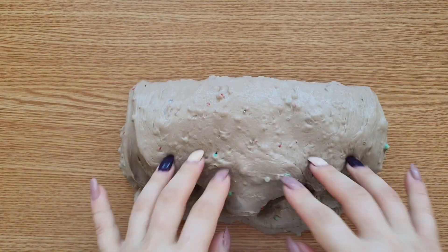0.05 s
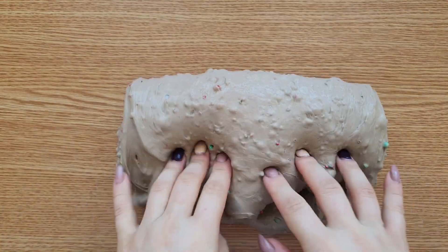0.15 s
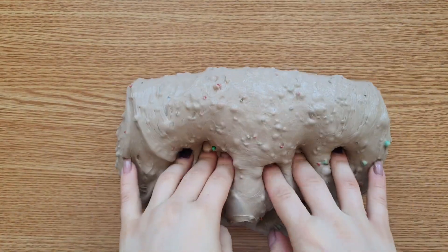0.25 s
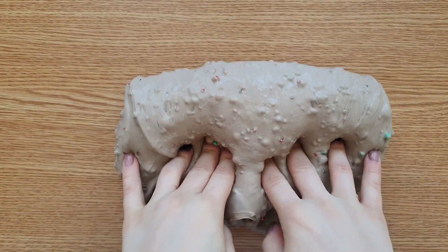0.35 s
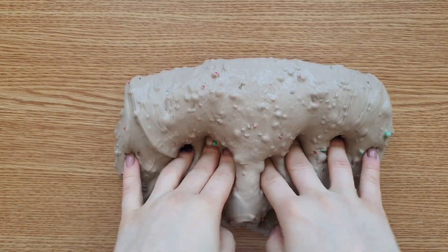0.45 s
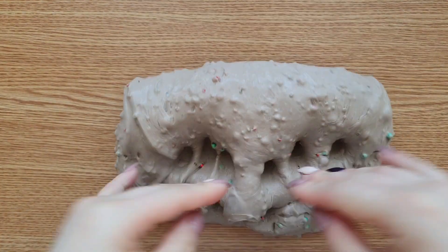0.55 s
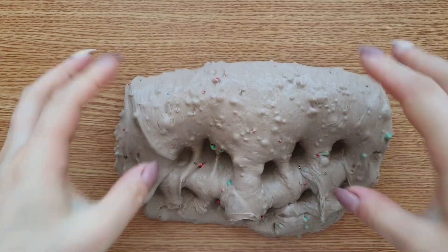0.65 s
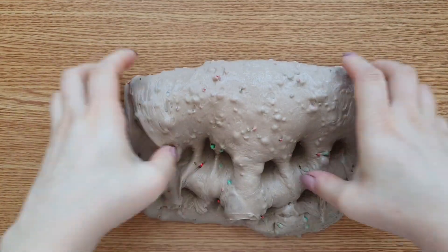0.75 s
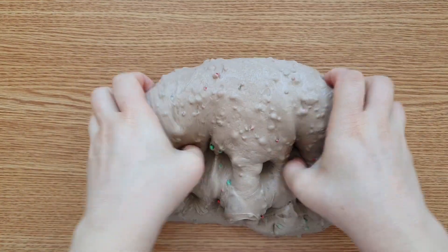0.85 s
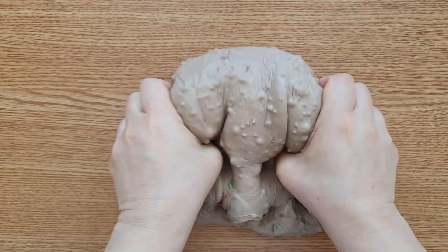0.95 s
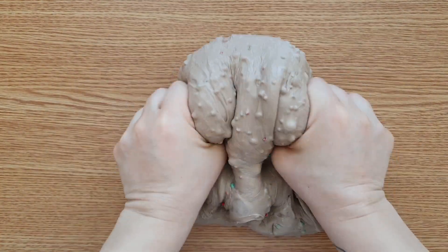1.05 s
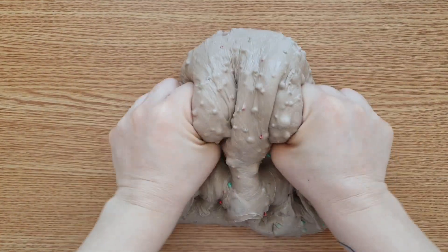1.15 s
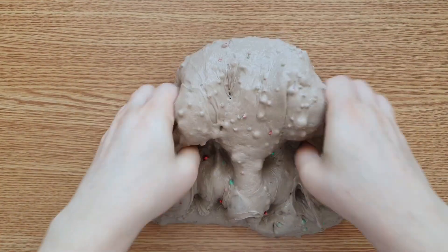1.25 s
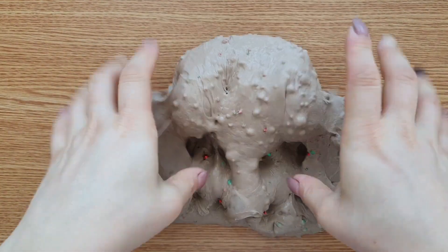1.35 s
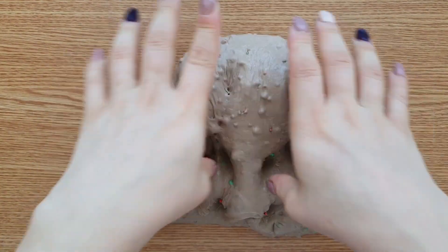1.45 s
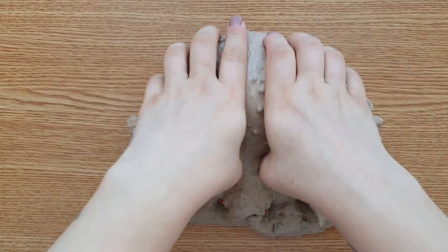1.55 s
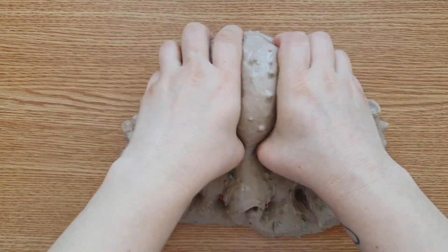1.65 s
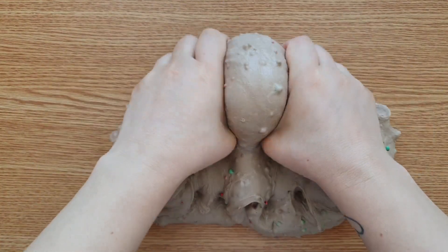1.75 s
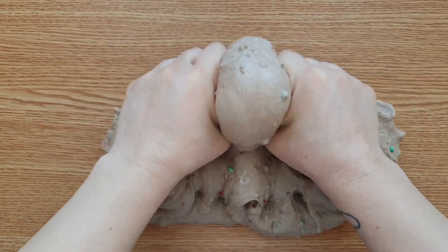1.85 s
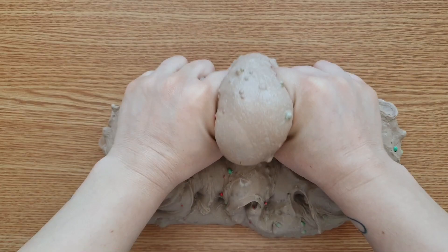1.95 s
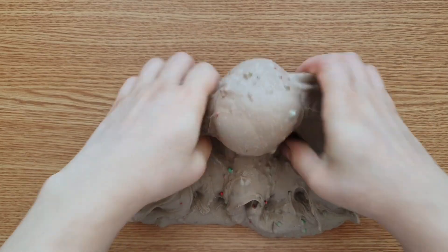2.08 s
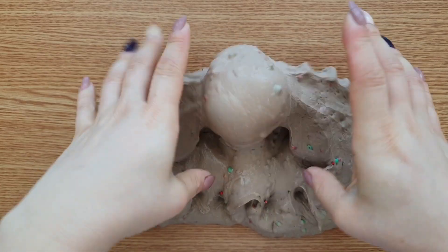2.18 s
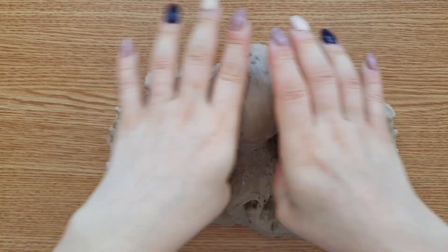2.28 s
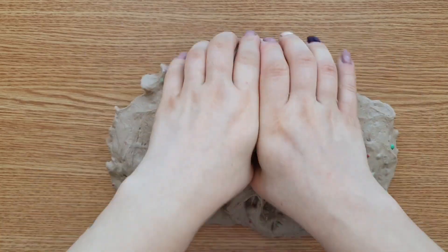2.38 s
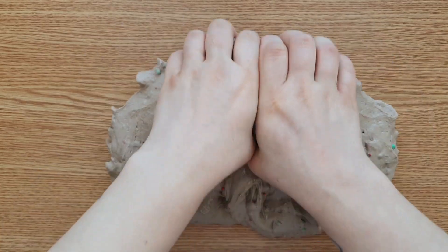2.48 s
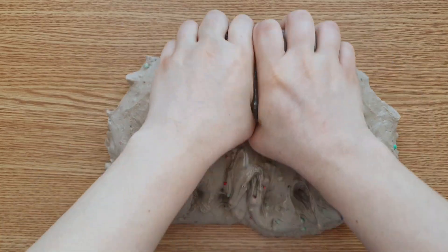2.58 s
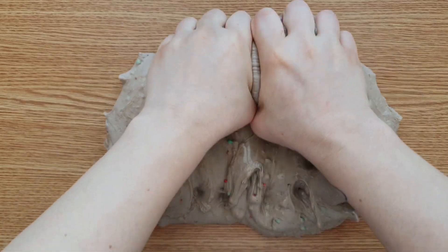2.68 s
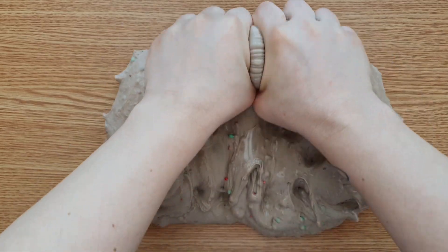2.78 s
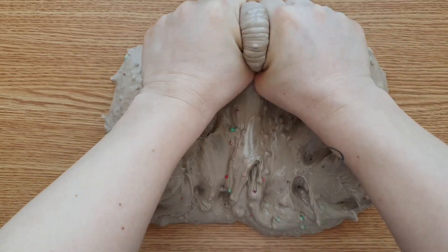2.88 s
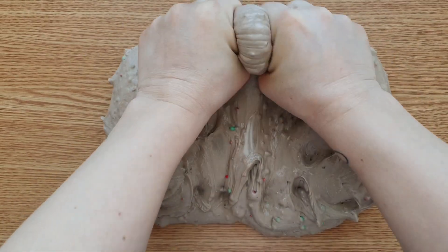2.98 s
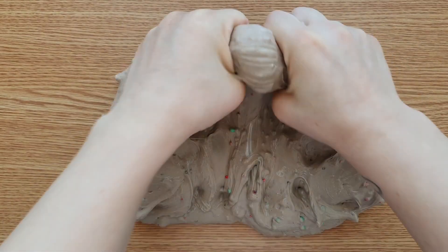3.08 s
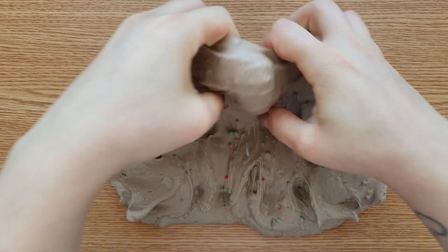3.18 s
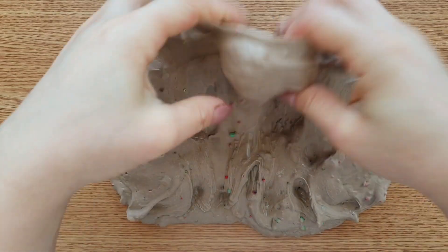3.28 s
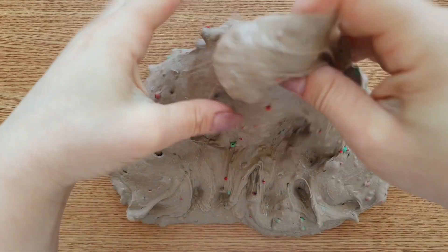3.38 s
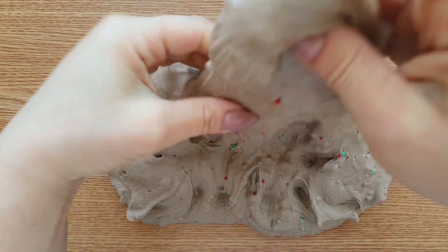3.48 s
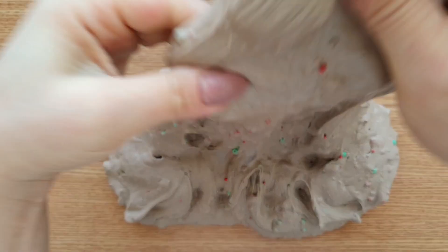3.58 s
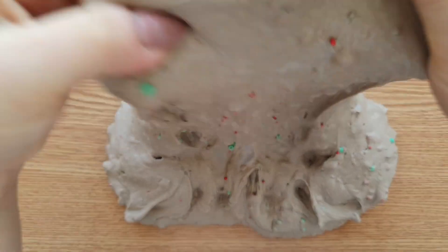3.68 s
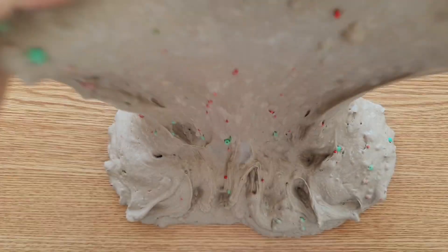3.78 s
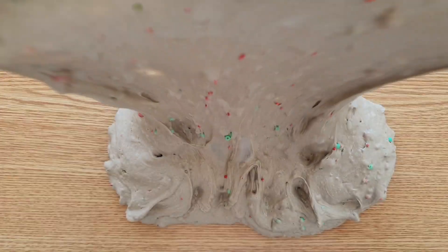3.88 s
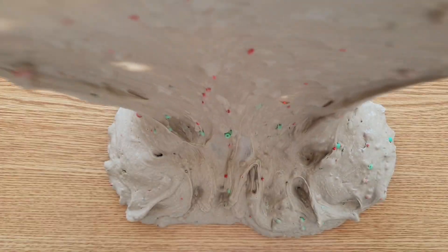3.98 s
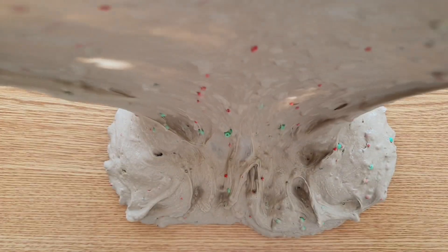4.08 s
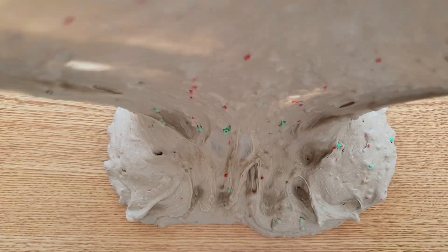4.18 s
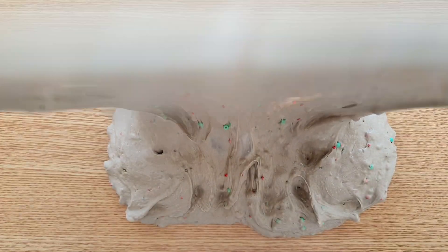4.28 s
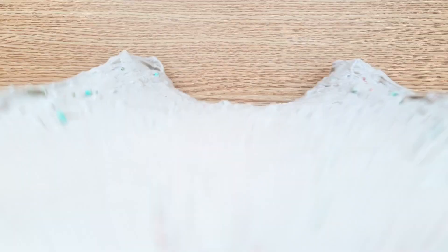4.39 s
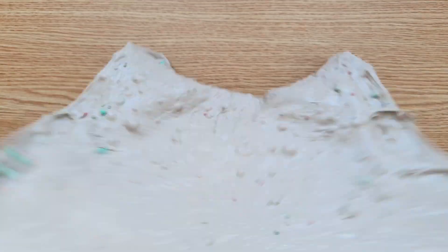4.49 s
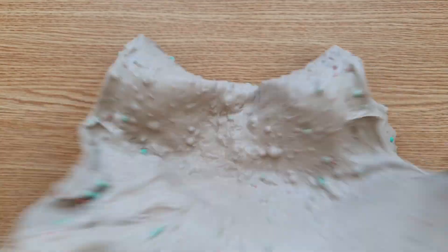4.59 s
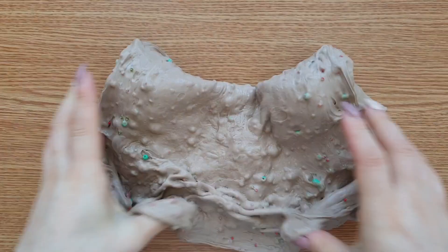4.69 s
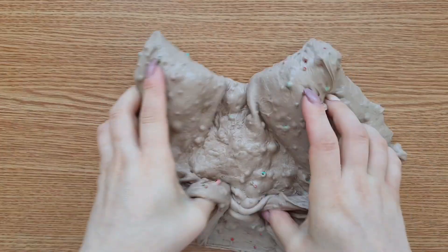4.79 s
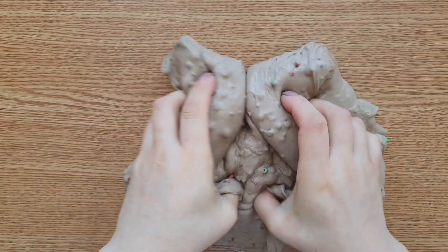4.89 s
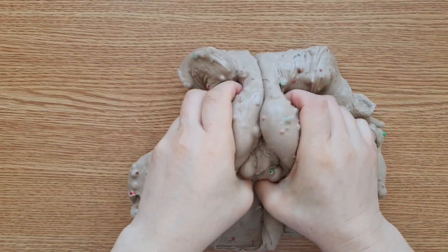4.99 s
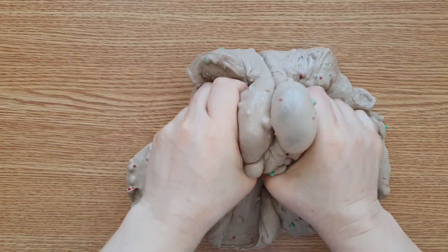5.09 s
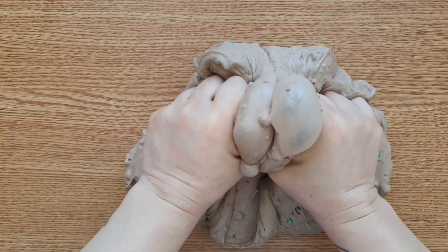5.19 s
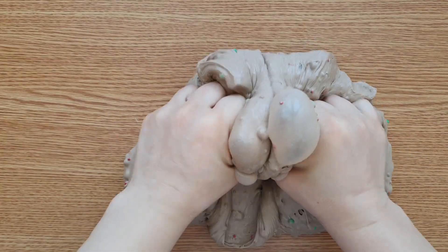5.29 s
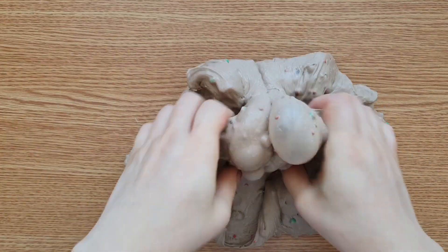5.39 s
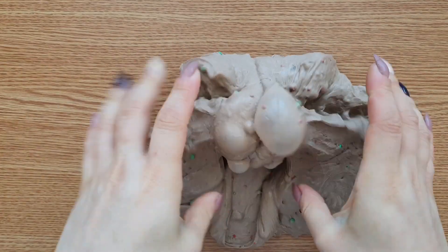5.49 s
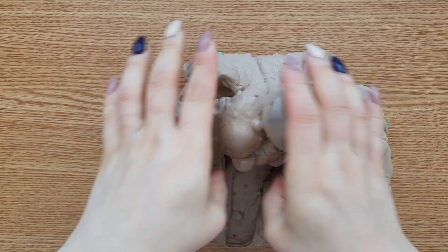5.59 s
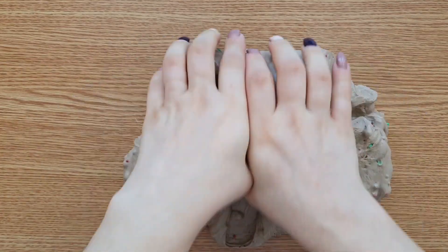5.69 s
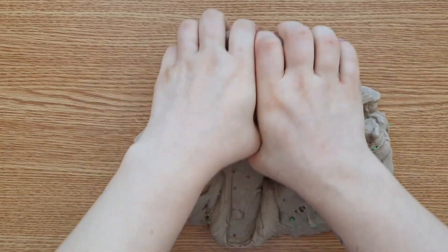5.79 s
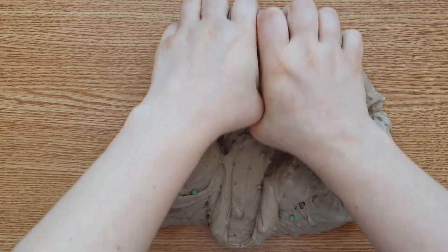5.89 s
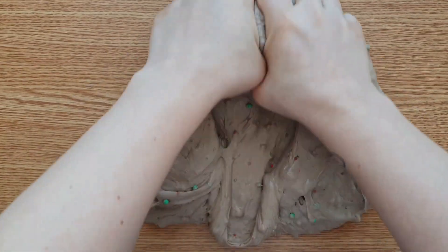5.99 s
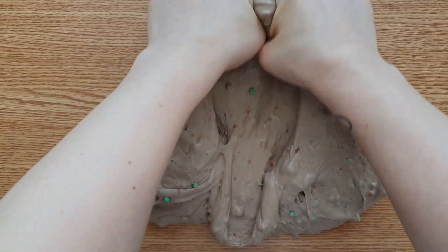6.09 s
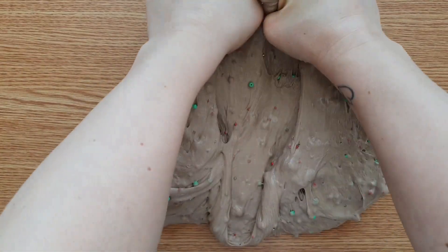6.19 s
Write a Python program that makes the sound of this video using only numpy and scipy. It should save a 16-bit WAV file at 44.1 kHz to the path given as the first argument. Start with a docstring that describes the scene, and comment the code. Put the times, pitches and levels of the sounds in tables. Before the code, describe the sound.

Hands knead thick beaded slime on a wooden table, with wet pops, crackles, squelches and soft thuds, a quiet fizzing stretch, then louder bursts.

```python
"""Two hands knead thick beaded slime on a wooden table, close up in stereo, in a small room that answers.
For two seconds pockets pop (short damped sines), slaps and wet squelches (lumpy noise) ring the table modes,
and air fizzes and crackles from the folds (shaped noise, tiny bursts). After 2.5 s comes a dense, loud volley.
Bubbles gurgle (rising sines), and until 4.6 s the slime is held up as a sheet that fizzes evenly.
Then the kneading returns, with a last loud volley near 6 s; low noise rocks the table under the hands."""
import sys
import numpy as np
from scipy import signal
from scipy.fft import rfft, irfft, next_fast_len
from scipy.io import wavfile
from scipy.ndimage import uniform_filter1d, minimum_filter1d, map_coordinates

SR = 44100
rng = np.random.default_rng(int(sys.argv[2]) if len(sys.argv) > 2 else 0)


def elevation(decibels):
    """Turn decibel levels (scalar or array-like) into linear amplitude ratios."""
    levels = np.asarray(decibels, float)
    return 10 ** (levels / 20)


def to_wav(s):
    """Save 16-bit WAV."""
    ch = np.atleast_2d(s).T  # columns
    pcm = np.round(np.clip(ch, -1, 1) * 32767)  # PCM
    wavfile.write(sys.argv[1], SR, pcm.astype(np.int16))


N = 275625  # length in samples
CURVE_STEP = 32  # samples between the points of a slow level curve


def unit(x):
    """Scales a signal to an rms of 1."""
    return x / np.sqrt(np.mean(x ** 2) + 1e-20)


def along(points, hz):
    """Reads a curve of (Hz, value) points on a logarithmic frequency axis."""
    point_hz, value = np.transpose(points)
    return np.interp(np.log(hz + 1), np.log(point_hz + 1), value)


def wobble(rate):
    """A smooth random curve with this many random points a second."""
    points = rng.standard_normal(int(N * 400 / SR) + 4)
    return map_coordinates(points, [np.arange(N) * min(rate, 399) / SR])


def filtered(x, response):
    """Multiplies the spectrum of x by a response, which may be complex, at each frequency."""
    m = next_fast_len(N + SR)
    spectrum = rfft(x, m) * response(np.fft.rfftfreq(m, 1 / SR))
    return irfft(spectrum, m)[..., :N]


# How alike left and right are. Each row: frequency in Hz, likeness from 0 (unrelated) to 1 (the same).
LIKENESS = [(60, 0.85), (180, 1), (550, 0.76), (1650, 0.067), (4970, 0), (15000, 0.048)]


def spread(pair):
    """Mixes two unrelated signals to a left and right that are alike mainly in the bass."""
    def weights(hz):
        angle = np.arccos(np.clip(along(LIKENESS, hz), 0, 1)) / 2
        return np.array([np.cos(angle), np.sin(angle)])

    mid, side = filtered(pair, weights)
    return np.array([mid + side, mid - side])


def bursts(s, gain, hz, cycles, size, glide=0):
    """Sums damped sines, one per row; each starts softly and falls to 1/e over its number of cycles."""
    t = np.arange(size) / SR
    phase = np.clip(hz, 50, 18000)[:, None] * t  # in cycles
    ring = np.sin(2 * np.pi * phase * (1 + glide * phase / 2))
    decay = np.exp(-phase / cycles[:, None])
    soft_start = 1 - np.exp(-(phase / 0.29) ** 2)
    wave = gain[:, None] * ring * decay * soft_start
    at = np.round(s * SR).astype(int)[:, None] + np.arange(size)
    return np.bincount(at.ravel(), wave.ravel(), N + size + SR)[:N]


def swells(s, rise_s, hold_s, db, sag_db_per_s, fade_db_per_s):
    """Power of each gesture, one per row: it rises, sags all along, and after the hold also fades."""
    t = np.arange(0, N, CURVE_STEP) / SR - s[:, None]
    rise = np.clip(t / np.abs(rise_s[:, None]), 0, 1) ** 2
    late = np.maximum(t - (rise_s + hold_s)[:, None], 0)
    level_db = db[:, None] - sag_db_per_s * np.maximum(t, 0) - fade_db_per_s * late
    return (rise * elevation(level_db)) ** 2


def per_sample(curve):
    """Holds each point of a slow curve until the next, giving one value per sample."""
    return curve.repeat(CURVE_STEP)[:N]


# Air pockets that burst. Each row: start in seconds, relative level in dB, ring of the pocket in Hz,
# relative level of the sharp snap in dB.
POCKETS = [(0.169, -28, 2540, -7), (0.2007, -34, 5500, 1), (0.4625, -13.5, 1980, -11.5),
           (0.486, -10.5, 4730, -3), (0.8313, -23, 3730, 0.5), (0.9, -28, 8700, -2.5),
           (0.931, -19.5, 7200, -30), (0.967, -30.5, 5240, 12), (1.0005, -15, 6500, 1),
           (1.0426, -14, 3850, -9), (1.059, -10.5, 4400, 1), (1.068, -15, 7000, 5), (1.509, -46, 5800, -12),
           (1.5494, -24, 4500, 2), (1.6076, -28, 7350, -5), (1.656, -18, 2690, 0),
           (1.6708, -4.5, 3840, -14.5), (1.7106, -5, 7760, 6), (1.782, -25, 1110, -15),
           (1.8255, -18.5, 3360, -4), (1.8488, -20, 1336, -25.5), (1.8485, -23, 11000, -2.5),
           (1.871, -11.5, 6900, -7.5), (1.88, -21.5, 7100, -2.5), (1.941, -18.5, 8600, 4.5),
           (2.0158, -27, 2230, -22), (2.344, -61, 6740, 5), (2.379, -37, 6950, 11),
           (2.4368, -26, 8600, -11), (2.4582, -33, 1786, -68), (2.561, -28, 2120, -12),
           (2.5735, 10.5, 3310, -10.5), (2.5987, -2, 2420, -2), (2.6748, 6, 6830, -19),
           (2.6753, -5, 4000, -38), (2.6898, -5.5, 3000, -7), (2.7049, 4.5, 6300, -18.5),
           (2.7064, -1, 1780, -4), (2.7307, -9.5, 2180, -7), (2.7382, -4.5, 2540, -3.5),
           (2.792, 2, 9400, -7.5), (2.806, -5.5, 3000, 3.5), (2.8446, 1.5, 2900, -6.5),
           (2.896, -12, 6100, -4), (2.9883, -28, 1780, -29.5), (3.3002, -28.5, 3200, -9.5),
           (3.3648, -33, 1720, -11), (3.4675, -26.5, 3370, -5), (3.89, -28.5, 4460, -3.5),
           (4.126, -37.5, 7600, 4.5), (4.17, -32.5, 4830, -29.5), (4.553, -27, 1560, -20.5),
           (4.5913, -20, 3000, -18), (4.627, -12, 4270, -8.5), (4.6877, -11.5, 1410, -5),
           (4.744, -23, 4000, -15.5), (4.777, -25.5, 1870, -12), (4.8358, -24, 2650, 2),
           (4.9202, -26, 5940, -2.5), (5.0164, -6.5, 4330, -3), (5.04, -13.5, 1423, 4),
           (5.0782, -25, 2770, -17), (5.1363, -14.5, 7400, 4.5), (5.2153, -10.5, 7000, -11),
           (5.232, -14.5, 7500, 1), (5.3177, -15.5, 3330, -20), (5.3467, -13, 3380, -21.5),
           (5.3929, -13.5, 3430, -21.5), (5.6047, -31.5, 3000, -13.5), (5.7376, -23.5, 5330, -5),
           (5.7731, 0, 2250, -18), (5.797, 2.5, 1924, -17), (5.8383, 8, 3570, -18.5),
           (5.9123, 10, 3000, -21), (5.925, -6, 3000, -22.5), (5.986, -5.5, 5800, -35),
           (5.997, -13, 6800, -12), (6.01, 1.5, 1480, -6), (6.026, -5, 2560, -21.5), (6.057, -8, 4090, -12),
           (6.081, 3, 6280, -41.5), (6.0903, 3, 2290, -21.5), (6.22, -12.5, 6340, -8.5)]


def pops(count=14):
    """The skin snaps, the opened pocket rings and sputters on, and a knock goes into the table."""
    s, db, pocket_hz, snap_db = np.transpose(POCKETS)
    chance = rng.standard_normal((len(s), 3))
    after = rng.random((len(s), count))
    size, tune = rng.standard_normal((2, len(s), count))
    cycles = 0.7 * np.exp(-snap_db / 28)  # a soft, wet opening rings longer
    long_ring = np.maximum(cycles, 1)
    # pockets sit left or right of centre: each side shifts in time and level, in opposite directions
    shift_s = 0.000012 * chance[:, 0]
    shift_db = 4 / 2 * chance[:, 0]
    sputter_db, sputter_s, pitch_scatter = -11, 0.014, 0.2  # the skin tears on after each pop

    def burst(at, gain, detune):
        hz = pocket_hz * np.exp(pitch_scatter * detune / long_ring)
        pocket = bursts(at, gain, hz, cycles, size=500)
        over_hz = hz * 1.63 * np.exp(0.023 * chance[:, 1])
        over = bursts(at, gain * elevation(-7.0) / long_ring ** 2, over_hz, cycles, size=150)
        under = bursts(at, gain * elevation(-12.5), hz * 0.7, 0.62 * cycles, size=300)
        snap_hz = 10000 * np.exp(0.31 * chance[:, 2] + 0.27 * detune)
        snap = bursts(at, gain * elevation(snap_db + 4.5), snap_hz, 1.45 + 0 * s, size=60)
        return pocket + over + under + snap

    def heard(at, level_db):
        total = burst(at, elevation(level_db - 0.5), 0)
        for k in range(count):
            later = at + 2 * cycles / pocket_hz + sputter_s * after[:, k] ** 2
            gain = elevation(level_db + sputter_db - 9.7 * after[:, k]) * size[:, k] / long_ring
            total = total + burst(later, gain, tune[:, k])
        return total

    air = np.array([heard(s - .0002 - side * shift_s, db + side * shift_db) for side in (1, -1)])
    knock = bursts(s, elevation(db - 30.5), 480 + 0 * s, 0.84 + 0 * s, size=600)
    return air + table(knock, bare_db=0.0)


# Slaps of the mass on the table. Each row: start in seconds, relative level in dB, frequency of the blow in Hz.
SLAPS = [(0.464, -4.5, 580), (0.478, -3, 275), (1.751, -17, 850), (1.752, -22, 288), (2.598, -6, 294),
         (2.704, -3.5, 404), (4.576, -10, 730), (4.626, -9, 587), (4.639, -14, 250), (4.745, -16.5, 480),
         (5.317, -18.5, 304), (5.398, -13.5, 272), (5.798, -8, 510), (6.008, -4.5, 375)]


def thuds():
    """Each slap is one soft blow, a sine of about one cycle, into the table top."""
    s, db, hz = np.transpose(SLAPS)
    return table(bursts(s, elevation(db - 1), hz, 1.01 + 0 * s, size=900), bare_db=-7.5)


# Ringing modes of the table top. Each row: frequency in Hz, relative level in dB,
# time to die by 60 dB in seconds.
TABLE_MODES = [(205, -9, 0.42), (248, -7, 0.34), (372, -9, 0.36), (432, -16, 0.38), (530, -12, 0.3),
               (590, -5, 0.3), (630, -3, 0.35), (711, -15, 0.34), (890, -10, 0.3)]


def table(force, bare_db):
    """The table top rings at its modes, each a resonator; part of the force is heard directly."""
    def response(f):
        total = elevation(bare_db)
        for mode_hz, db, t60 in TABLE_MODES:
            damping = 1j * f * np.log(1000) / np.pi / t60
            total = total + elevation(db) * 1j * f * 18 / (mode_hz ** 2 - f ** 2 + damping)
        return total

    return filtered(force, response)


# Wet slips of the mass. Each row: start in seconds, rise in seconds, hold in seconds, relative level in dB.
SLIPS = [(0, 0.0017, 0.034, -52.5), (0.202, 0.003, 0.043, -47.5), (0.449, 0.013, 0.023, -25),
         (0.833, 0.0092, 0.37, -43.5), (1.084, 0.14, 0.043, -29.5), (1.64, 0.065, 0.17, -38),
         (1.964, 0.053, 0.054, -31.5), (2.576, 0.0052, 0.049, -30.5), (2.679, 0.0046, 0.092, -25.5),
         (2.801, 0.028, 0.071, -37), (2.993, 0.033, 0.24, -44), (3.355, 0.0061, 0.026, -51),
         (4.164, 0.0041, 0.042, -58), (4.548, 0.0077, 0.038, -30.5), (4.616, 0.0045, 0.006, -26.5),
         (4.675, .005, 0.11, -36), (4.8, 0.024, 0.3, -45.5), (5.026, 0.079, 0.064, -33.5),
         (5.251, 0.076, 0.075, -29), (5.758, 0.012, 0.25, -26), (6, 0.0037, 0.028, -21),
         (6.11, 0.0046, 0.16, -39.5)]


def squelch_curve():
    """Squelch level in dB: the powers of all slips add up over a faint rest level."""
    power = swells(*np.transpose(SLIPS), sag_db_per_s=20, fade_db_per_s=207.5).sum(0)
    return per_sample(10 * np.log10(power + elevation(-73.5) ** 2))


# Colour of the squelch force. Each row: frequency in Hz, relative level in dB.
SQUELCH_COLOUR = [(110, -23), (200, 3), (600, -4.5), (1200, -8), (2500, -8.5), (6000, -26.5)]


def squelch(level_db):
    """Lumpy noise is the wet slipping; it is passed on to the table top, which rings on."""
    lumps = rng.standard_normal((2, N)) * elevation(4 * wobble(70))
    force = unit(filtered(lumps, lambda hz: elevation(along(SQUELCH_COLOUR, hz))))
    return spread(table(force * elevation(level_db - 9.5), bare_db=2.0))


# Air pressed slowly out of a fold. Each row: start in seconds, rise in seconds, hold in seconds,
# relative level in dB, centre in Hz.
FOLD_HISSES = [(0.41, 0.064, 0.0088, -43.5, 3000), (1.164, 0.063, 0.042, -37, 2460),
               (1.962, 0.068, 0.014, -33, 3000), (2.294, 0.025, 0.19, -65.5, 1282),
               (2.952, 0.12, 0.11, -41, 3500), (4.759, 0.035, 0.27, -48.5, 4070),
               (5.247, 0.069, 0.073, -34, 3310)]
# Air leaking from a pocket that has just burst. Each row: start in seconds (moved to the nearest pop),
# hold in seconds, relative level in dB, centre in Hz.
POCKET_LEAKS = [(.169, 0.05, -58.5, 2650), (.463, 0.0063, -33.5, 2710), (.831, 0.15, -51.5, 5950),
                (1.0, 0.015, -38, 6070), (1.069, 0.058, -26, 11330), (1.509, 0.015, -62.5, 8200),
                (1.549, 0.077, -53, 4440), (1.671, 0.072, -40.5, 3210), (1.711, 0.18, -41, 4800),
                (1.94, 0.034, -56.5, 9000), (2.34, 0.3, -63, 4890), (2.573, 0.1, -29.5, 3000),
                (2.69, 0.17, -24.5, 3690), (2.844, 0.13, -42, 2644), (4.168, 0.16, -59, 4520),
                (4.554, 0.22, -47.5, 2330), (5.016, 0.098, -38.5, 4630), (5.136, 0.095, -42, 7230),
                (5.215, 0.071, -59.5, 6740), (5.773, 0.042, -31, 2266), (5.838, 0.076, -39, 2790),
                (5.925, 0.11, -34, 2767), (6.0095, 0.03, -24.5, 1700), (6.08, 0.075, -30, 6730),
                (6.091, 0.078, -24, 2535)]
# The slime is held up and stretched into a sheet: start in seconds, end in seconds.
STRETCH_SPAN = (2.95, 4.56)


def fizz_curves():
    """Fizz level in dB and centre in Hz: powers of the air jets add up, the stronger ones pull the centre."""
    stretch_db, stretch_hz = -66.5, 5480  # the sheet fizzes evenly
    floor_db, floor_hz = -74, 3000  # a faint, even room hiss stays under everything
    pop_s = np.transpose(POCKETS)[0]
    leaks = [(pop_s[np.abs(pop_s - s).argmin()], 0.0034, *more) for s, *more in POCKET_LEAKS]  # rise 3.4 ms
    s, rise_s, hold_s, db, hz = np.transpose(leaks + FOLD_HISSES)
    jets = swells(s, rise_s, hold_s, db, sag_db_per_s=30.5, fade_db_per_s=181)
    t = np.arange(jets.shape[1]) * CURVE_STEP / SR
    stretch = elevation(stretch_db) ** 2 * (t > STRETCH_SPAN[0]) * (t < STRETCH_SPAN[1])
    floor = elevation(floor_db) ** 2 + 0 * t
    air = np.vstack([jets, stretch, floor])
    total = air.sum(0)
    centre_hz = np.exp(np.log([*hz, stretch_hz, floor_hz]) @ air / total)
    return per_sample(10 * np.log10(total)), per_sample(centre_hz)


def fizz(level_db, centre_hz):
    """Air squeezed from the folds: hiss and tiny ticks through a broad resonance that moves with the opening."""
    tick_db = 2.5 * rng.exponential(size=N // 16 + 1).clip(0, 5).repeat(16)[:N]
    ticks = unit(rng.standard_normal((2, N)) * elevation(tick_db))
    hiss = 0.052 * rng.standard_normal((2, N))
    hz, t, z = signal.stft(spread(ticks + hiss), SR, nperseg=256)
    at = np.minimum((t * SR).astype(int), N - 1)
    octaves = np.log2((hz[:, None] + 1) / centre_hz[at])
    peak = np.exp(-octaves ** 2)
    skirt = elevation(1 - 2.7 * np.abs(octaves)) * (hz[:, None] > 900)
    shape = peak + skirt
    shape = shape / np.sqrt(np.mean(shape ** 2, axis=0))
    air = unit(signal.istft(z * shape, SR, nperseg=256)[1][:, :N])
    return air * elevation(level_db - 1.5 + 2.2 * wobble(110))


def crackle(level_db, centre_hz, count):
    """Small bubbles at the beads burst at random times, as loud and as high as the two curves say."""
    when, loudness = rng.random((2, count))
    pitch, ring = rng.standard_normal((2, count))
    at = (when * N).astype(int)
    gain = elevation(level_db[at] + 2 + 8 * loudness ** 3)
    hz = centre_hz[at] * np.exp(.5 * pitch)
    return bursts(at / SR, gain, hz, .9 * np.exp(.25 * ring), size=200)


# Runs of wet bubbles. Each row: start in seconds, length in seconds, relative level in dB, usual pitch in Hz.
BUBBLE_RUNS = [(2.741, 0.035, -30.5, 470), (3.029, 0.11, -38, 940), (3.057, 0.088, -45, 520),
               (3.205, 0.043, -48, 555), (5.101, 0.11, -35, 800), (5.316, 0.04, -33, 499),
               (5.39, 0.028, -35, 860), (5.796, 0.038, -21, 805), (6.015, 0.06, -17, 1007)]


def gurgles(count=10):
    """Air works through wet folds as runs of bubbles, each rising in pitch as it closes."""
    s, length_s, db, hz = np.transpose(BUBBLE_RUNS)[..., None]
    slot = rng.random((len(s), count))
    size, tune = rng.standard_normal((2, len(s), count))
    at = (s + length_s * (np.arange(count) + slot) / count).ravel()
    gain = elevation(db + 3 * size).ravel()
    bubble_hz = (hz * np.exp(0.2 * tune)).ravel()
    # glide: the pitch rises by 0.06 of its start with every cycle
    return bursts(at, gain, bubble_hz, 2 + 0 * at, size=1200, glide=0.06)


# The weight of the hands comes onto the table. Each row: start in seconds, rise in seconds,
# hold in seconds, relative level in dB.
LEANS = [(0.435, 0.045, 0.073, -40.5), (0.884, 0.039, 0.024, -53), (1.11, .15, 0.033, -46),
         (1.983, 0.068, 0.039, -46.5), (2.567, 0.11, 0.4, -54), (4.217, 0.19, 0.17, -50.5),
         (4.534, 0.011, 0.032, -46), (4.6, 0.023, 0.0073, -31), (5.08, 0.077, 0.15, -52.5),
         (5.234, 0.15, 0.068, -43), (5.768, 0.026, 0.16, -43.5), (5.996, 0.044, 0.022, -45)]


def push_curve():
    """Push level in dB: the powers of all leans add up over a faint rest level."""
    power = swells(*np.transpose(LEANS), sag_db_per_s=25.5, fade_db_per_s=150).sum(0)
    return per_sample(10 * np.log10(power + elevation(-71) ** 2))


# Colour of the rocking table frame. Each row: frequency in Hz, relative level in dB.
ROCKING_COLOUR = [(20, -29.5), (45, -11.5), (75, -12), (110, -15), (160, -26), (250, -32.5)]


def push(level_db):
    """The weight of the hands rocks the table: low noise that follows the push level."""
    colour = ROCKING_COLOUR + [(1000, -120)]  # nothing but bass
    rock = filtered(rng.standard_normal((2, N)), lambda hz: elevation(along(colour, hz)))
    return unit(spread(rock)) * elevation(level_db + 0.92 * wobble(81))


# How the room dies away. Each row: frequency in Hz, time to die by 60 dB in seconds.
ROOM_DECAY = [(200, 0.51), (1000, 0.44), (4000, 0.35), (12000, 0.11)]


def room(x):
    """A short silence, then a noise tail in which each frequency dies at its own speed."""
    out = np.zeros((2, N + 2 * SR))
    step = int(SR / 4)  # a new noise tail is drawn every quarter second
    gap = round(.003 * SR)  # silence until the first wall
    for start in range(0, N, step):
        hz, t, z = signal.stft(rng.standard_normal((2, SR // 2)), SR, nperseg=256)
        tail = signal.istft(z * elevation(-60 * t / along(ROOM_DECAY, hz)[:, None]), SR, nperseg=256)[1]
        tail = tail * (1 - np.exp(-np.arange(tail.shape[1]) / SR / 0.0019))  # soft onset
        tail = tail / np.linalg.norm(tail[0])
        wet = signal.fftconvolve(x[None, start:start + step], tail, axes=1)
        out[:, start + gap:][:, :wet.shape[1]] += wet
    return spread(out[:, :N])


def scene():
    """Sharp bursts come from between the hands, softer sounds spread wide; the room answers all but the push."""
    fizz_db, centre_hz = fizz_curves()
    squelch_db, push_db = squelch_curve(), push_curve()
    same_hz = np.ones(N)
    beads = crackle(fizz_db, centre_hz, count=1200)
    wet_blips = crackle(squelch_db + 2.5, 890 * same_hz, count=500)
    # sparse bright ticks of the skin follow the fizz level only in part
    skin_ticks = crackle(0.75 * fizz_db - 1.5, 9000 * same_hz, count=450)
    sharp = pops() + thuds() + beads + wet_blips + skin_ticks
    bubbles = spread(np.array([gurgles(), gurgles()]))
    soft = fizz(fizz_db, centre_hz) + bubbles + squelch(squelch_db)
    answer = elevation(-10) * room(sharp.mean(0) + elevation(-3.5) * soft[0])
    heard = sharp + soft + push(push_db) + answer
    return heard * elevation([[.6], [-.6]])  # left slightly louder than right, in dB


# Colour of the microphone. Each row: frequency in Hz, gain in dB.
MIC_COLOUR = [(15, -13.5), (60, 0), (4000, 5), (8000, 4), (12000, 4.5), (15700, 2.5), (16300, -31),
              (17500, -57)]


def microphone(x):
    """The microphone weakens the deepest bass, lifts the treble and cuts off the very top."""
    return filtered(x, lambda hz: elevation(along(MIC_COLOUR, hz)))


def limiter(x, ahead_s, hold_s):
    """Looks ahead: the gain sinks just before a burst that would pass full scale and recovers after it."""
    ahead, hold = round(ahead_s * SR), round(hold_s * SR)
    need = 1 / np.maximum(np.abs(x).max(0), 1)
    low = minimum_filter1d(need, ahead + hold, origin=(hold - ahead) // 2)
    return np.clip(x * uniform_filter1d(low, ahead), -1, 1)


def band_limit(x):
    """A steep low-pass at the top of the band."""
    return signal.sosfilt(signal.butter(12, 16990, fs=SR, output="sos"), x)


def record(dry):
    """Gives the scene its microphone colour and limits its peaks."""
    mix = limiter(microphone(dry), ahead_s=0.005, hold_s=0.015)
    return band_limit(mix)


dry = scene()
out = record(dry)
to_wav(out)
```